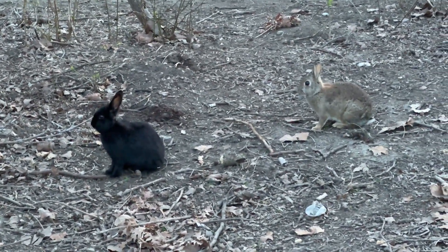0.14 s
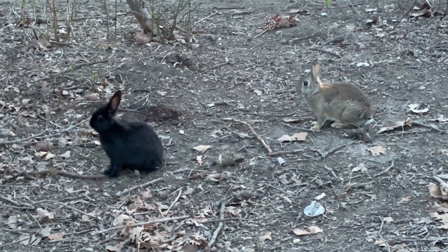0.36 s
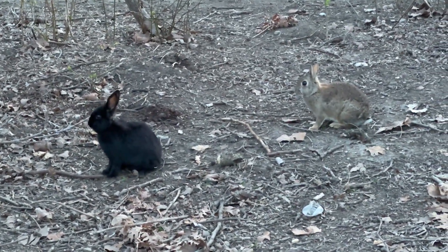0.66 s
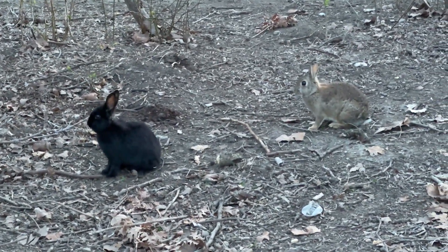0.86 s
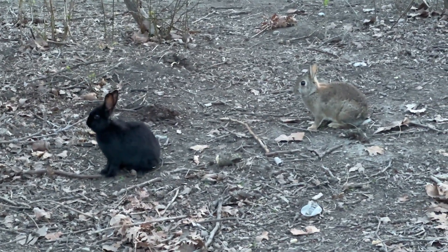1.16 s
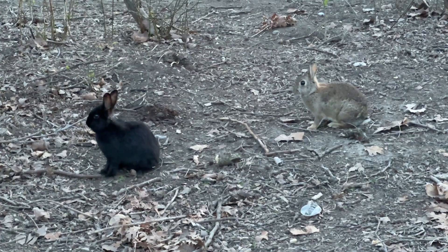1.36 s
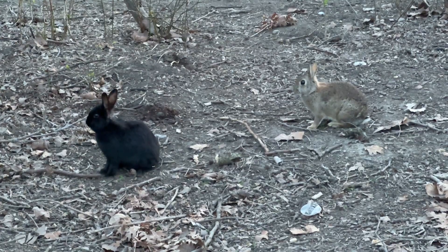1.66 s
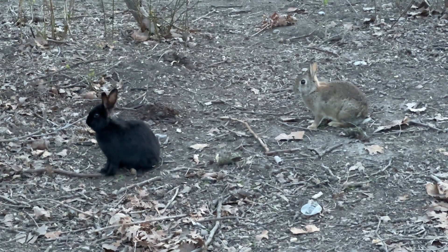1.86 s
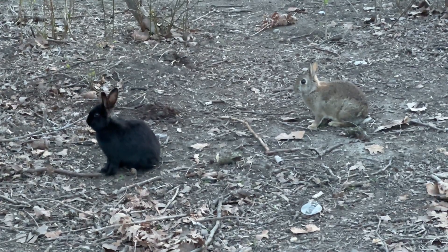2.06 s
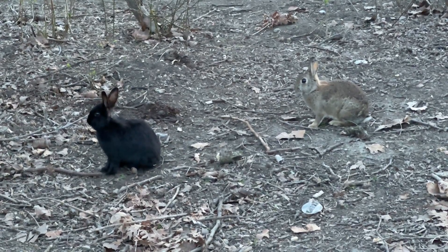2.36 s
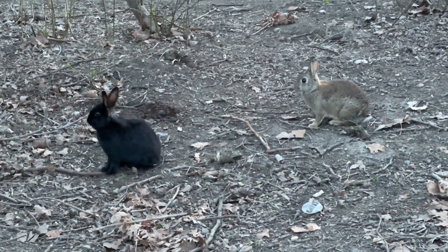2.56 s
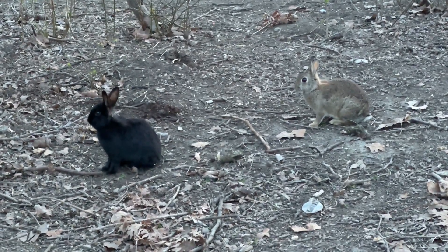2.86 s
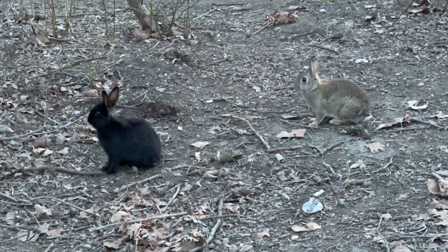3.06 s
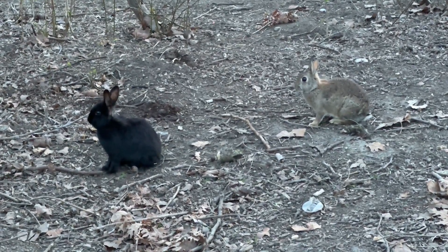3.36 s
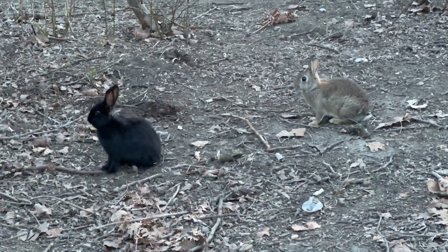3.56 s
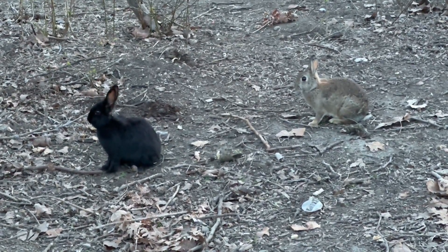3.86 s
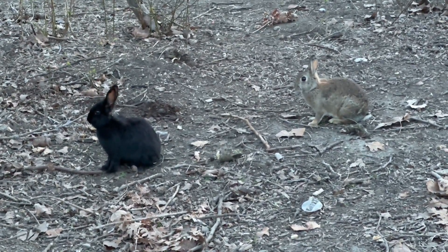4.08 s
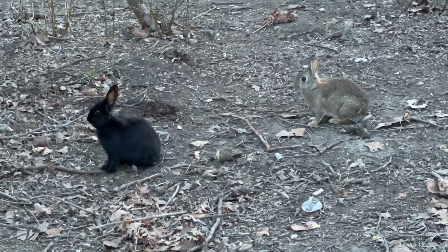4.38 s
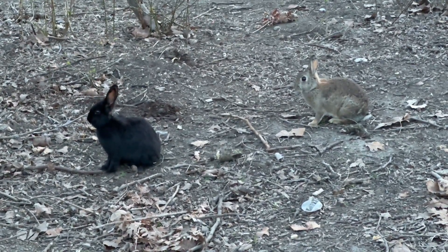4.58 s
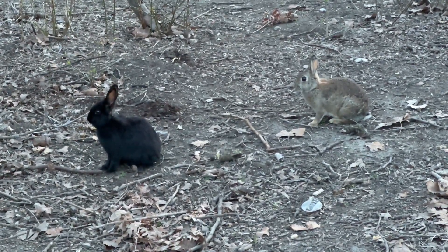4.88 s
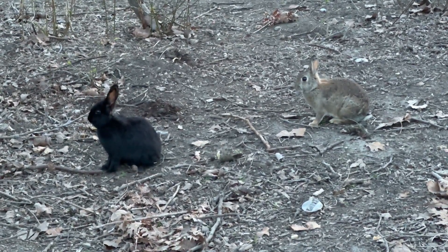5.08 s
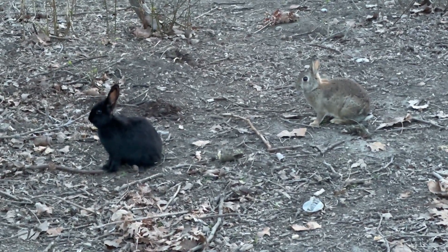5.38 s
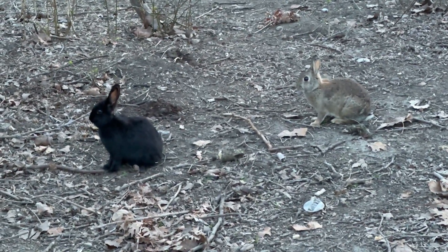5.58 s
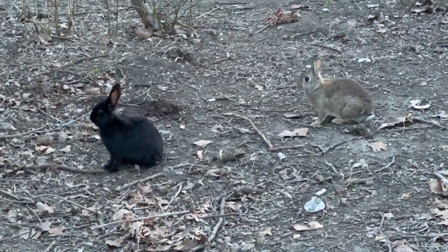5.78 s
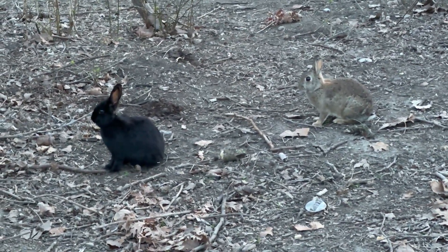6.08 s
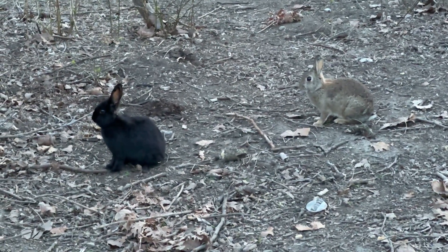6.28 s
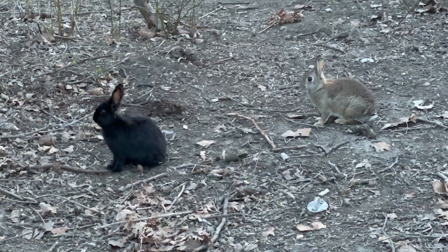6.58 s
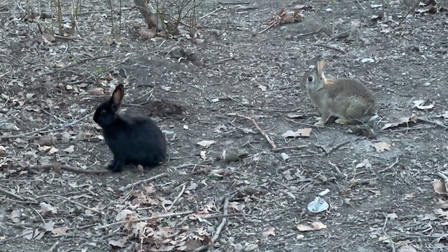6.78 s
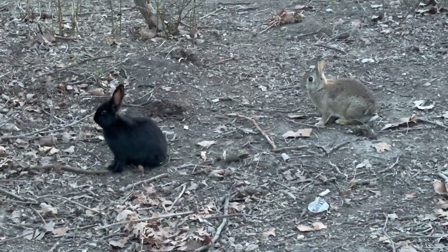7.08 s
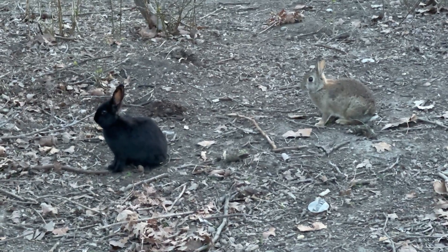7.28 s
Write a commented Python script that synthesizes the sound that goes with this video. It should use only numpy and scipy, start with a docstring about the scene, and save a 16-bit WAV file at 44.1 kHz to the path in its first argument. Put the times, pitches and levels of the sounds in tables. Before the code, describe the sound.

Outdoor park ambience: continuous dull traffic roar and throbbing exhaust rumble, growing slightly fuller and brighter as passing cars overlap in the second half.

```python
"""A steady far roar of city traffic over a deep exhaust rumble, heard from a wooded park on a phone.
Roar and rumble are coloured noise. Nearer cars swell from about three seconds on: their noise brightens
with hiss as they come close, narrow bands of noise drift in pitch, and gliding sines make engines drone.
A few dry leaves tick close to the microphone as filtered noise bursts; a far bird gives one faint sine peep."""
import sys
import numpy as np
from scipy import signal
from scipy.fft import rfft, irfft
from scipy.io import wavfile
from scipy.ndimage import uniform_filter1d

SR = 44100
rng = np.random.default_rng(int(sys.argv[2]) if len(sys.argv) > 2 else 0)


def inscribe(sig):
    """Save sig as 16-bit PCM at rate SR to the path in sys.argv[1].

    A 1-D sig is mono; a 2-D sig holds one channel per row.
    Samples are clipped to [-1, 1] before scaling.
    """
    pcm = np.round(np.clip(np.atleast_2d(sig).T, -1, 1) * 32767)
    wavfile.write(sys.argv[1], SR, pcm.astype(np.int16))


N = 328104  # samples, about 7.4 s

# Levels below are in dB before any trim or wander added by the function that plays them.

# Nearer cars going by. Each row: closest at in seconds, time to fade in seconds,
# tyre roar level in dB, hiss level in dB.
CAR_PASSES = [(1.45, 0.18, -63, -81), (1.85, 0.27, -54.5, -94), (2.47, 0.18, -59, -76),
              (3.2, 0.33, -62, -69), (3.619, 0.35, -57, -70.5), (4.05, 0.65, -48.5, -70.5),
              (5.12, 0.69, -47.5, -64), (5.931, 0.32, -47, -64), (6.8, 0.45, -48, -68),
              (7.32, 0.33, -46.5, -70)]
# Narrow bands of noise that swell, drift in pitch and fade, like reflections off the ground.
# Each row: strongest at in seconds, time to fade in seconds, pitch in Hz,
# band width in Hz, glide in Hz per second, level in dB.
GLIDING_BANDS = [(.15, .3, 1424, 60, -60.5, -62.5), (.8, .3, 740, 50.2, 70.5, -62.5),
                 (1.25, 0.28, 1670, 70, 0.5, -67), (2.299, 0.4, 1385, 55, -45, -62.5),
                 (6.0, 0.29, 1040, 191, -78, -53.5), (7.0, 0.51, 1483, 171, -59, -55)]
# Upper edge of the hiss: mostly climbs, jumps near three seconds, drops back at the end.
# Each row: time in seconds, edge in Hz.
HISS_UPPER_EDGE = [(0, 6500), (2.2, 6570), (2.4, 7430), (2.85, 7950), (3.1, 11200), (3.8, 10010),
                   (4.4, 10500), (5.1, 12190), (6.7, 13030), (7.44, 10000)]
# Spectrum of the nearer tyre roar. Each row: frequency in Hz, relative level in dB.
CAR_SPECTRUM = [(110, -11), (200, 1), (290, -4.5), (370, -0.5), (560, -6), (780, -1), (1030, 1), (1250, -4),
                (1800, -5), (2300, -9.5), (3400, -15), (5000, -27.5), (7500, -34), (12000, -59)]
# Spectrum of the tyre hiss. Each row: frequency in Hz, relative level in dB.
HISS_SPECTRUM = [(3000, -13), (4800, 4), (6000, 14), (7300, 5.5), (8100, -2.5), (9100, 12), (10400, 13),
                 (12000, -1.5)]
# One heavy engine leading the rumble. Each row: time in seconds, firing rate in Hz, level in dB.
HEAVY_ENGINE = [(.5, 56.8, -41), (.6, 58.4, -42), (1.05, 62.9, -42.5), (1.3, 62.34, -36.5),
                (1.55, 60, -43.5), (1.72, 62.2, -38), (1.9, 64.8, -41.5), (2.12, 63.2, -54),
                (2.27, 62.3, -37), (2.72, 62, -48), (2.95, 63.1, -34.5), (3.1, 66.07, -49), (3.3, 68, -38),
                (3.5, 64.35, -46), (3.72, 62.1, -41), (3.9, 59.7, -50), (4.08, 58.5, -41.5),
                (4.28, 57, -53), (4.55, 59.3, -38), (4.75, 67.7, -50), (4.95, 66, -36), (5.15, 64, -47.5),
                (5.8, 70, -55), (6.06, 69, -35), (6.2, 64.24, -47), (6.8, 60, -39), (7.08, 58.6, -47),
                (7.25, 58, -37), (7.44, 57, -53)]
# Other engines heard for a while. Each row: start in seconds, length in seconds,
# first firing rate in Hz, last firing rate in Hz, level in dB.
ENGINE_DRONES = [(0.156, 0.63, 73.5, 79, -47), (1.801, 0.52, 53.16, 48.32, -42),
                 (1.822, 0.48, 87, 85.8, -50), (2.727, .42, 191, 197, -56),
                 (3.223, 0.72, 158, 147.3, -53.5), (3.502, 0.9, 122.5, 139.3, -52),
                 (3.897, 0.55, 203.7, 212.5, -52), (4.2, 1.33, 143, 125, -53.5),
                 (4.55, 0.24, 73.4, 77, -38), (5.101, 2.1, 129, 121.3, -51.5),
                 (5.3, 1.37, 195.1, 211.9, -56.5), (6.22, 0.43, 49, 51.7, -40.5),
                 (6.76, 0.32, 117, 112.4, -48.5), (7.12, 0.41, 52.8, 52, -46)]
# Exhaust rumble of heavy traffic. Each row: time in seconds, level in dB.
RUMBLE_LEVEL_DB = [(0, -36), (.1, -48), (.28, -39.5), (.48, -48.5), (.62, -41), (1.8, -47), (1.92, -40.5),
                   (2.14, -45.5), (3.5, -44), (3.78, -41.5), (4.28, -45), (5.08, -44.5), (5.5, -45.5),
                   (6.07, -43.5), (6.6, -48), (6.9, -42), (7.1, -44.5), (7.44, -45)]
# Spectrum of the exhaust rumble. Each row: frequency in Hz, relative level in dB.
RUMBLE_SPECTRUM = [(28, -19.5), (40, -6), (50, -0.5), (63, 0.5), (76, 0), (92, -11), (130, -28.5),
                   (250, -43.5), (600, -99.5)]
# Far roar. Each row: time in seconds, level in dB.
FAR_LEVEL_DB = [(0, -47.5), (.5, -48), (1.3, -47), (2.4, -47), (7.44, -46.5)]
# Spectrum of the far roar. Each row: frequency in Hz, relative level in dB.
FAR_SPECTRUM = [(110, -0.5), (180, -6.5), (280, -14), (420, -15.5), (500, -13.5), (570, -15), (1000, -12.5),
                (1250, -16), (1650, -17.5), (2100, -24.5), (3500, -39), (5000, -53), (7500, -69.5),
                (9300, -62), (12500, -66)]
# Dry leaves close by. Each row: start in seconds, level in dB, pitch in Hz,
# half width of the band as a share of the pitch, decay in seconds.
LEAF_TICKS = [(.2, -74.5, 5800, .2, 0.027), (.236, -71.5, 5300, .14, .02), (.268, -77, 5100, .16, .035),
              (2.023, -59.5, 8000, .42, 0.002), (2.237, -70, 9600, .3, 0.0018)]
# Likeness of the two microphone ports for far sound. Each row: frequency in Hz, coherence from 0 to 1.
FAR_COHERENCE = [(90, .92), (250, .82), (450, .74), (750, .52), (900, .25), (1150, .25), (1400, .85),
                 (2000, .97), (4500, .94), (10000, .75)]
# Likeness of the two ports for the nearer cars. Each row: frequency in Hz, coherence from 0 to 1.
CAR_COHERENCE = [(100, .99), (420, .94), (600, .78), (1000, .78), (1250, .7), (1500, .94), (2200, .98),
                 (4400, .94), (5200, .995), (6550, .995), (7200, .86), (7900, .998), (9000, .998),
                 (9600, .91), (11000, .84), (12000, .66)]
# Balance of the far sound. Each row: frequency in Hz, left minus right in dB.
FAR_LEAN = [(80, 1), (220, 1.5), (400, 3), (700, 4.5), (950, 6.5), (1120, 4), (1550, -2), (3000, 0)]
# Balance of the nearer cars. Each row: frequency in Hz, left minus right in dB.
CAR_LEAN = [(100, 3), (700, -1.5), (950, 3), (1250, 2.5), (1600, 0), (2500, -.4), (9000, 0), (12000, 1.5)]
# Phase between the ports. Each row: frequency in Hz, radians by which left leads.
PORT_LEAD = [(60, .03), (600, .1), (880, .35), (1100, 0), (1320, -.9), (2000, 0), (3200, .52), (4500, .3),
             (5100, 0), (6700, 0), (7250, 1.1), (7750, 3.14), (9050, 3.14), (9900, 2.35), (12000, 2.15)]

FRAME = 2048  # samples in a spectrum frame; frames overlap by half
TIME = np.arange(N) / SR
FRAME_TIME = np.arange(0, N + FRAME // 2, FRAME // 2) / SR
BIN_HZ = np.maximum(np.arange(FRAME // 2 + 1) * SR / FRAME, 1)[:, None]
WHOLE_HZ = np.maximum(np.arange(N // 2 + 1) * SR / N, 1)  # bins of one spectrum over the whole scene
OPPOSITE = np.array([[1], [-1]])  # left and right with opposite signs

ROAR_FALLOFF, HISS_FALLOFF = 1.34, 1.84  # powers of distance: hiss dies away sooner than roar
PATCHY_DB = 0.9  # depth of the patchy fading that moving air gives the tyre noise
SPEED_WANDER = 0.014  # share by which an engine's speed wanders
DRONE_ATTACK_S, DRONE_RELEASE_S = 0.13, 0.11
TOP_HZ = 12200  # upper limit of the phone


def undb(db):
    """Decibels to gain."""
    return 10 ** (np.asarray(db) / 20)


def curve(table, t, axis=1):
    """One column of a time table at times t."""
    table = np.asarray(table)
    return np.interp(t, table[:, 0], table[:, axis])


def over_hz(table, at=BIN_HZ):
    """A frequency table joined by straight lines on a log frequency axis."""
    hz, value = np.transpose(table)
    return np.interp(np.log(at), np.log(hz), value)


def walk(rate):
    """Smooth chance with spread 1, changing about rate times a second."""
    k = int(SR / rate)
    held = np.repeat(rng.standard_normal(N // k + 2), k)
    smooth = uniform_filter1d(uniform_filter1d(held, k), k)[:N]
    return smooth / smooth.std()


def colour(table, low_hz):
    """Gain per bin with unit mean power, falling steeply under low_hz."""
    low_cut = 1 + (low_hz / BIN_HZ) ** 4
    gain = undb(over_hz(table)) / low_cut
    return gain / np.sqrt(np.mean(gain ** 2))


def at_ports(gain, likeness, balance):
    """Noise of a given colour arriving from many directions at two ports; unit gain gives rms near 1."""
    alike = np.clip(over_hz(likeness), 0, 1)
    common, apart = signal.stft(rng.standard_normal((2, N)), SR, nperseg=FRAME)[2]
    # the larger the common share, the more alike the ports
    common = common * np.sqrt((1 + alike) / 2)
    apart = apart * np.sqrt((1 - alike) / 2)
    lean = undb(over_hz(balance) / 2) * np.exp(0.5j * over_hz(PORT_LEAD))
    pair = np.array([(common + apart) * lean, (common - apart) / lean])
    return signal.istft(gain * pair, SR, nperseg=FRAME)[1][:, :N]


def patches(width_hz=260, length_s=0.09):
    """Moving air strengthens some bands for a moment and thins others: smooth chance with spread 1."""
    field = rng.standard_normal((len(BIN_HZ), len(FRAME_TIME)))
    bins = max(int(width_hz * FRAME / SR), 1)
    frames = max(int(length_s / FRAME_TIME[1]), 1)
    field = uniform_filter1d(uniform_filter1d(field, bins, axis=0), frames, axis=1)
    return field / field.std()


def passing(level_db, falloff):
    """Summed level of the cars in dB; each swells as it nears and fades with a power of its distance."""
    at_s, fade_s = np.transpose(CAR_PASSES)[:2]
    distance = np.hypot(1, (TIME[:, None] - at_s) / fade_s)  # 1 at the closest point
    power = (undb(level_db) / distance ** falloff) ** 2
    return 10 * np.log10(np.sum(power, axis=1))


def roar_level():
    """Tyre roar of all the nearer cars, in dB before trim."""
    return passing([car[2] for car in CAR_PASSES], ROAR_FALLOFF)


def hiss_level():
    """Tyre hiss of all the nearer cars, in dB before trim."""
    return passing([car[3] for car in CAR_PASSES], HISS_FALLOFF)


def near_cars(db=1.0, open_db=-17.5, treble_share=0.33, dull_hz=1700):
    """Nearer tyre roar; its treble dulls while the hiss is weak beside it, more with each octave."""
    level_db = roar_level()
    # hiss standing open_db from the roar leaves the treble as it is
    openness_db = np.interp(FRAME_TIME, TIME, hiss_level() - level_db - open_db)
    treble_db = treble_share * openness_db
    octaves = np.log2(1 + (BIN_HZ / dull_hz) ** 2) / 2  # counted smoothly upward from dull_hz
    gain = colour(CAR_SPECTRUM, low_hz=91) * undb(octaves * treble_db + PATCHY_DB * patches())
    return at_ports(gain, CAR_COHERENCE, CAR_LEAN) * undb(level_db + db)


def hiss(db=-6.5, flicker_db=1.5):
    """Thin tyre hiss, strongest while a car is closest, with a steep upper edge that moves in time."""
    edge = 1 / np.hypot(1, (BIN_HZ / curve(HISS_UPPER_EDGE, FRAME_TIME)) ** 20)
    gain = colour(HISS_SPECTRUM, low_hz=3000) * edge * undb(PATCHY_DB * patches())
    air = at_ports(gain, CAR_COHERENCE, CAR_LEAN)
    return air * undb(hiss_level() + db + flicker_db * walk(13))


def gliding_band(at_s, fade_s, hz, width_hz, glide_hz_per_s, db):
    """A narrow band of noise swells, drifts in pitch and fades, like a reflection off the ground."""
    centre = hz + glide_hz_per_s * (FRAME_TIME - at_s)
    band = np.exp(-((BIN_HZ - centre) / width_hz) ** 2)
    noise = at_ports(band / np.sqrt(np.mean(band ** 2)), CAR_COHERENCE, CAR_LEAN)
    distance = np.hypot(1, (TIME - at_s) / fade_s)
    return noise * undb(db) / distance ** ROAR_FALLOFF


def firing(hz, overtone_db):
    """An engine's firing tone and its octave, at a speed that wanders a little."""
    phase = 2 * np.pi * np.cumsum(hz * (1 + SPEED_WANDER * walk(18))) / SR
    return np.sin(phase) + undb(overtone_db) * np.sin(2 * phase)


def engine(start_s, length_s, first_hz, last_hz, db, flutter_db=2.0, overtone_db=-18):
    """A drone gliding with the engine's speed, fading in and out; reflections make it flutter."""
    t = TIME - start_s
    drone = firing(np.interp(t, [0, length_s], [first_hz, last_hz]), overtone_db)
    fade = np.clip(np.minimum(t / DRONE_ATTACK_S, (length_s - t) / DRONE_RELEASE_S), 0, 1)
    return drone * fade * undb(db + flutter_db * walk(14))


def heavy_engine(db=-0.7, flutter_db=1.2, overtone_db=-22):
    """A deep drone that follows the engine's speed and surges unevenly, about twice a second."""
    drone = firing(curve(HEAVY_ENGINE, TIME), overtone_db)
    sounding = 1.0 * (TIME >= HEAVY_ENGINE[0][0])
    fade = uniform_filter1d(sounding, SR // 10)
    return drone * fade * undb(curve(HEAVY_ENGINE, TIME, axis=2) + db + flutter_db * walk(21))


def rumble(db=0.4, steady=0.67, side_db=-25, surge_db=0.04):
    """Many exhausts beat against each other near 60 Hz; waves this long reach both ports alike."""
    gain = undb(over_hz(RUMBLE_SPECTRUM, WHOLE_HZ))
    mid, side = irfft(gain * rfft(rng.standard_normal((2, N))), N)
    # a handful of engines beat less deeply than pure noise does
    swell = uniform_filter1d(np.abs(signal.hilbert(mid)), SR // 20)
    mid = mid / swell ** steady
    pair = mid / mid.std() + undb(side_db) * side / side.std() * OPPOSITE
    return pair * undb(curve(RUMBLE_LEVEL_DB, TIME) + db + surge_db * walk(6.3))


def far_roar(waver_db=0.08):
    """Countless far tyres and engines, dulled by the air and scattered by the trees."""
    roar = at_ports(colour(FAR_SPECTRUM, low_hz=66), FAR_COHERENCE, FAR_LEAN)
    return roar * undb(curve(FAR_LEVEL_DB, TIME) + waver_db * walk(3))


def leaves(attack_share=0.28):
    """Each dry leaf crackles in one broad resonance; the shorter the burst, the sharper it starts."""
    out = np.zeros(N)
    t = np.arange(SR // 4) / SR
    for start_s, db, hz, width, decay_s in LEAF_TICKS:
        edges_hz = np.clip([hz * (1 - width), hz * (1 + width)], SR / 100, SR / 3)
        band = signal.butter(2, edges_hz, "band", fs=SR, output="sos")
        burst = signal.sosfilt(band, rng.standard_normal(len(t)))
        shape = np.exp(-t / decay_s) * (1 - np.exp(-t / (attack_share * decay_s)))
        i = int(start_s * SR)
        out[i:i + len(t)] += undb(db) * burst / burst.std() * shape
    lead = over_hz(PORT_LEAD, WHOLE_HZ)
    return irfft(rfft(out) * np.exp(0.5j * lead * OPPOSITE), N)


def bird(at_s=1.492, length_s=0.029, hz=4030, sink_hz_per_s=1800, db=-73):
    """One short, slightly falling peep from far off: a sine under a bell-shaped swell."""
    t = TIME - at_s
    swell = np.exp(-(t / length_s) ** 2)
    return undb(db) * swell * np.sin(2 * np.pi * (hz - sink_hz_per_s * t / 2) * t)


def scene(bass_pan_db=0.85):
    """All the traffic, its bass leaning a little to the left, and the small sounds of the park."""
    tyres = near_cars() + hiss() + sum(gliding_band(*band) for band in GLIDING_BANDS)
    bass = heavy_engine() + sum(engine(*drone) for drone in ENGINE_DRONES) + rumble()
    bass = bass * undb(bass_pan_db * OPPOSITE / 2)
    return tyres + bass + far_roar() + leaves() + bird()


def record(dry):
    """The phone cuts the deepest bass and the top."""
    low_cut = signal.butter(4, 32, "high", fs=SR, output="sos")
    top_cut = signal.ellip(8, 0.2, 70, TOP_HZ, fs=SR, output="sos")
    return signal.sosfilt(top_cut, signal.sosfilt(low_cut, dry))


dry = scene()
out = record(dry)
inscribe(out)
```